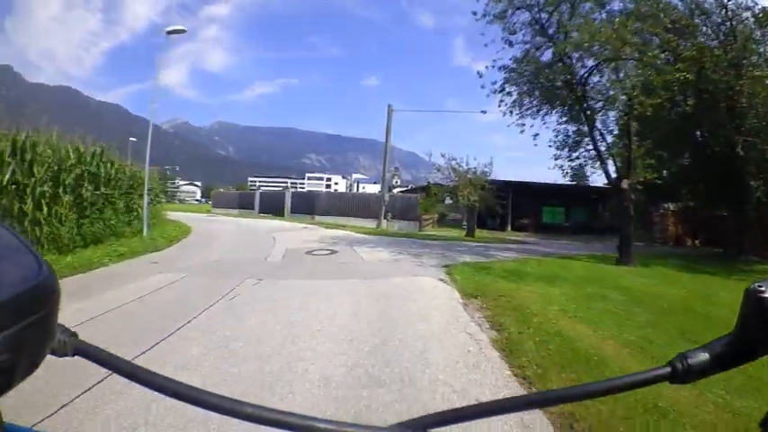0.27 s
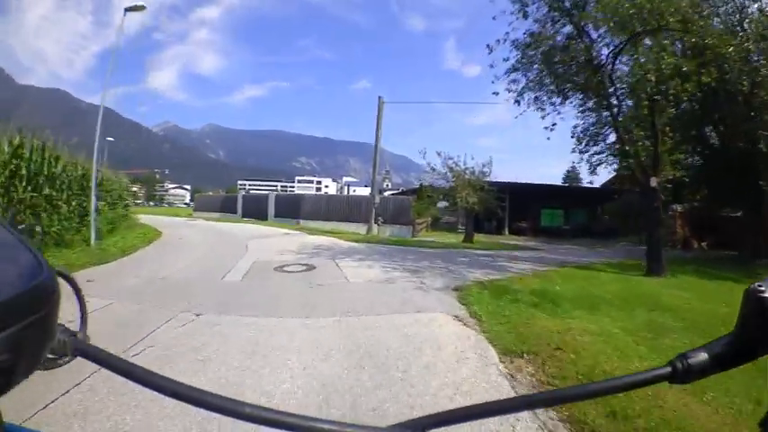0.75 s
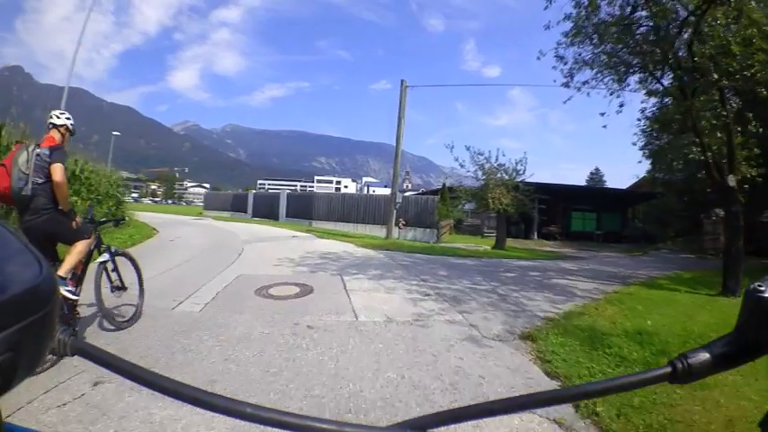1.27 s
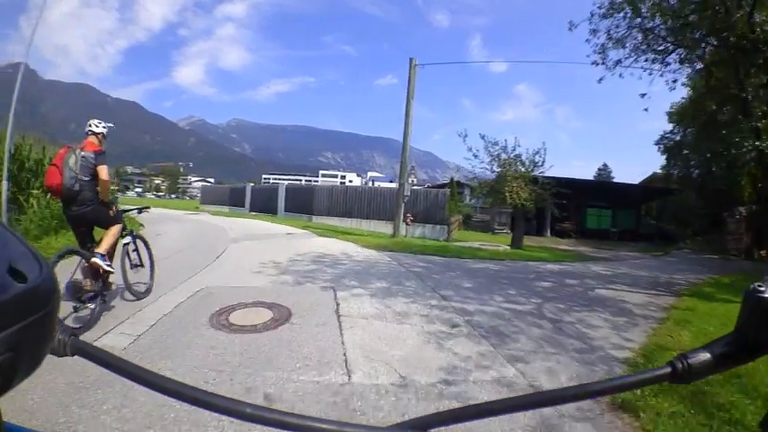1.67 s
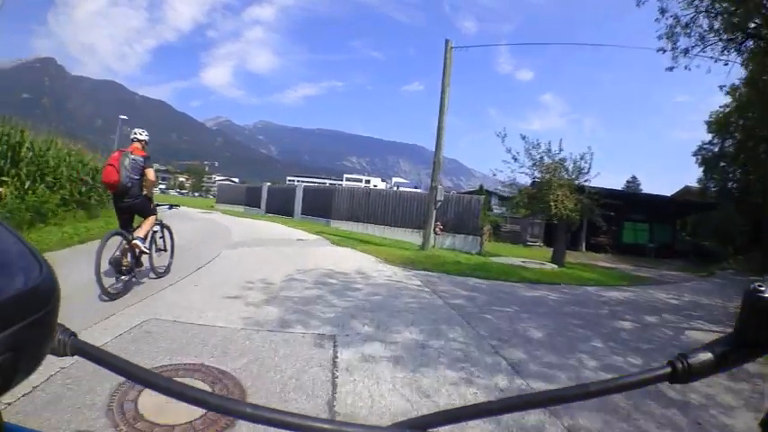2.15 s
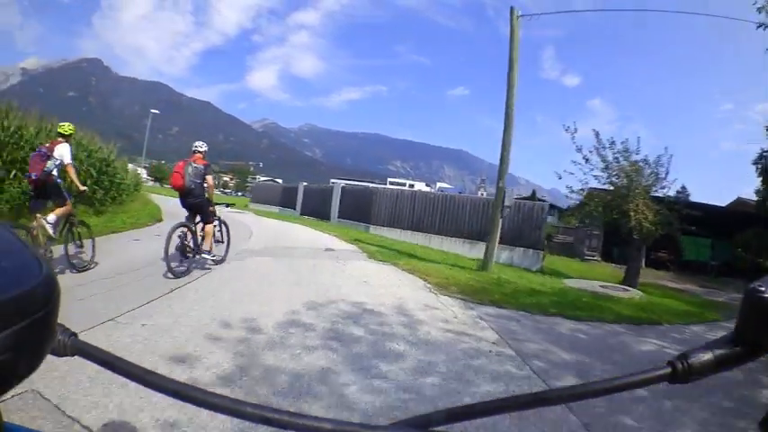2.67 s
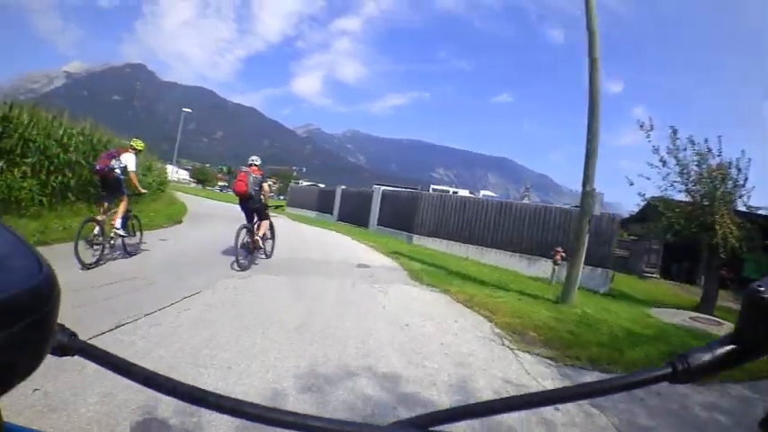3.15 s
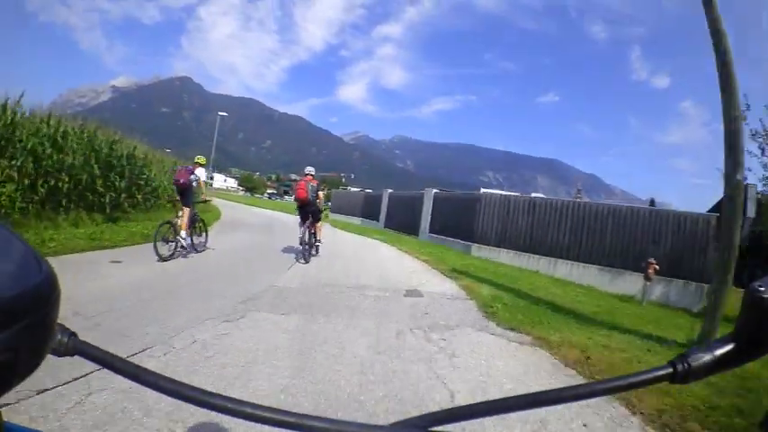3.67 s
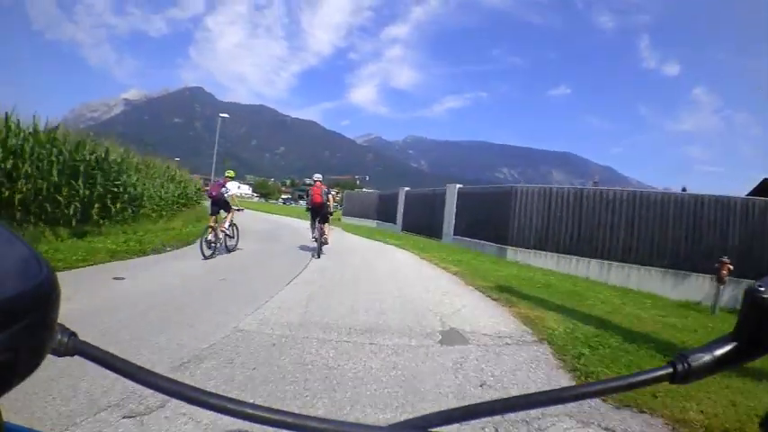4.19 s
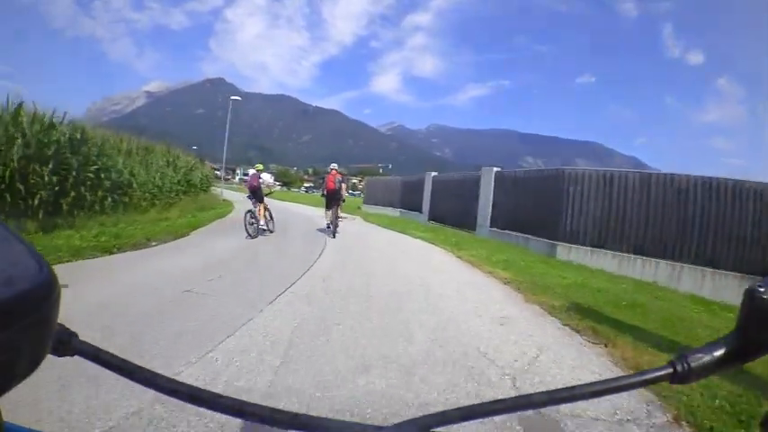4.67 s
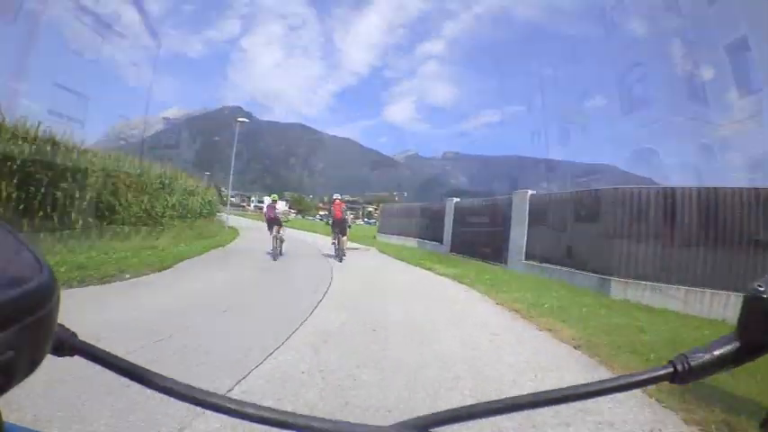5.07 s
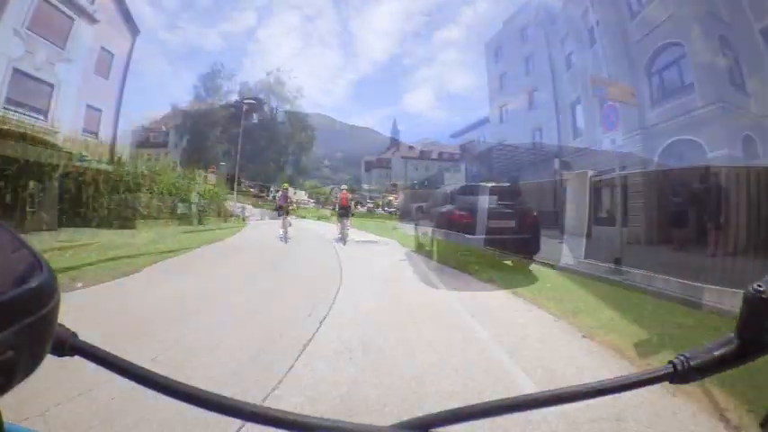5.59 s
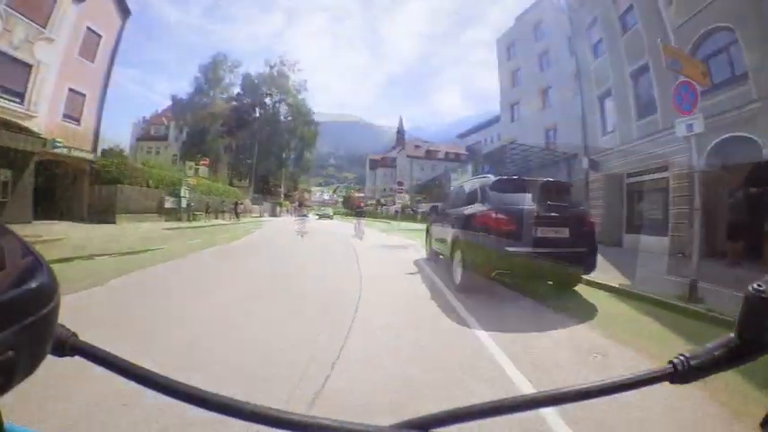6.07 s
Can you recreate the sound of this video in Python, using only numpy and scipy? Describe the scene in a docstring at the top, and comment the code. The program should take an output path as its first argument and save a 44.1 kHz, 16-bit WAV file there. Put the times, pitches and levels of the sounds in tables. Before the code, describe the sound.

Close, structure-borne sound of a bike riding along a paved road. The bar and its small housing hum low and unevenly over road rumble and a thin hiss. Isolated muffled thuds give way to hard double knocks with ringing frame and jingling loose fittings, momentarily ducking the sound. Softer bumps continue, another burst of knocks follows, and the ride settles into a quiet roll with a small, hollow tone passing through.

```python
"""A handlebar and the small housing fixed to it hum as a bicycle rolls over rough asphalt: filtered noise.
A low rumble and tyre hiss are noise too; short booms are swelling sines and freewheel ticks are pulsed noise.
Bumps knock through the frame and loose fittings rattle: decaying sines and noise bursts at listed times.
Hard knocks duck a gain control; towards the end hum and rumble grow quieter and a faint narrow drone swells."""
import sys
import numpy as np
from scipy import signal
from scipy.fft import rfft, irfft, next_fast_len
from scipy.io import wavfile
from scipy.ndimage import uniform_filter1d

SR = 44100
rng = np.random.default_rng(int(sys.argv[2]) if len(sys.argv) > 2 else 0)


def log_audio(samples):
    """Write samples as a 16-bit WAV file to the path given in sys.argv[1]."""
    # one column per channel
    frames = np.atleast_2d(samples).T
    # limit to full scale, then quantise
    limited = np.clip(frames, -1, 1)
    pcm = np.round(limited * 32767).astype(np.int16)
    wavfile.write(sys.argv[1], SR, pcm)


N = 279263
TIME = np.arange(N) / SR   # [s]
SIDES = np.array([[1], [-1]])   # opposite sign on left and right

# Resonances of bar and housing: (frequency [Hz], width [Hz], lift [dB])
HOUSING = [(177.3, 26.8, 8), (203, 14.6, 8.5), (310.4, 7.9, 7), (407, 71, 11.5), (489.7, 63, 7.5),
           (736, 69, 8.5)]


def from_db(db):
    """Amplitude ratio: 20 dB is a factor of ten."""
    return 10 ** (np.asarray(db) / 20)


def rms_one(x):
    """Normalisation: mean power is the mean square, here scaled to one."""
    return x / np.sqrt(np.mean(x ** 2) + 1e-20)


def in_time(rows):
    """Linear interpolation: each column of a curve becomes an envelope with a value at every sample."""
    s, *columns = np.transpose(rows)
    return [np.interp(TIME, s, c) for c in columns]


def drift(rate):
    """Slow random modulation: low-passed noise of rms 1, its amplitude response halved at rate [Hz]."""
    hz = np.arange(N // 2 + 1) * SR / N
    slow = rfft(rng.standard_normal(N)) / (1 + (hz / rate) ** 4)
    return rms_one(irfft(slow, N))


def stereo_noise(side_db):
    """Partial coherence: white noise common to both sides plus a share of opposite sign."""
    mid, side = rng.standard_normal((2, N))
    return mid + from_db(side_db) * side * SIDES


def coloured(x, spectrum):
    """Spectral shaping: noise is multiplied by a magnitude curve over log frequency; rms 1."""
    size = next_fast_len(N)
    hz, db = np.transpose(spectrum)
    bins = np.maximum(np.arange(size // 2 + 1) * SR / size, 1)
    gain = from_db(np.interp(np.log(bins), np.log(hz), db))
    return rms_one(irfft(rfft(x, size) * gain, size)[..., :N])


def resonant(x, resonances):
    """Resonance: each lightly damped mode lifts a narrow band and rings on."""
    for hz, width, lift_db in resonances:
        b, a = signal.iirpeak(hz, hz / width, fs=SR)
        x = x + (from_db(lift_db) - 1) * signal.lfilter(b, a, x)
    return x


def struck(modes, t, spread_db, detune):
    """Modal impulse response: a blow excites decaying sines of varied strength, tuning and side lead; peak 1."""
    hz, db, t60, skew = np.transpose(modes)[:, :, None]
    own, side, off = rng.standard_normal((3, len(modes), 1))
    lead = skew * np.sign(side) * SIDES[:, None]
    phase = 2 * np.pi * hz * (1 + detune * off) * t + lead
    decay = from_db(db + spread_db * own - 60 * t / t60)
    onset = 1 - np.exp(-t * hz.min() * 2 * np.pi)
    out = np.sum(decay * np.sin(phase), axis=1) * onset
    return out / np.abs(out).max()


def crunch(t, low_hz, high_hz, t60):
    """Contact noise: band-limited noise with a brief rise, then an exponential decay."""
    rise_s, side_db = 0.00011, -3.5
    sos = signal.butter(3, [low_hz, min(high_hz, .45 * SR)], "band", fs=SR, output="sos")
    mid, side = signal.sosfilt(sos, rng.standard_normal((2, len(t))))
    noise = rms_one(mid + from_db(side_db) * side * SIDES)
    return noise * from_db(-60 * t / t60) * (1 - np.exp(-t / rise_s))


def add(out, s, sound):
    """Superposition: a short sound is summed in at its time [s]."""
    at = round(s * SR)
    out[:, at:at + sound.shape[-1]] += sound[..., :N - at]


def drone():
    """Narrow-band noise: three bands, each passed twice through a resonator, swell and fade."""
    # Level of the drone: (time [s], level [dB])
    swell = [(5.3, -55), (5.48, -48.5), (5.62, -43), (5.85, -46.5), (6.0, -72)]
    # Its bands: (frequency [Hz], resonator width [Hz], level [dB])
    bands = [(838, 61, 0), (1295, 210, -7.5), (1780, 80, -15.5)]
    level_db, = in_time(swell)
    out = 0
    for hz, width, db in bands:
        b, a = signal.iirpeak(hz, hz / width, fs=SR)
        once = signal.lfilter(b, a, rng.standard_normal(N))
        out = out + from_db(db) * rms_one(signal.lfilter(b, a, once))
    return from_db(level_db) * rms_one(out)


def freewheel(fine_db, sharpness, uneven_db):
    """Periodic excitation: pawls brush over one tooth after another, at a rate set by the wheel, unevenly."""
    # Speed of the freewheel: (time [s], tick rate [1/s])
    tick_rate = [(.5, 35.5), (1.1, 38), (1.5, 37), (1.7, 24.2), (2.3, 24.8), (3.2, 23.5), (4.9, 23),
                 (5.6, 19)]
    # How firmly the pawls brush: (time [s], level over the fine hiss [dB])
    firmness = [(0, -2), (1, -2), (2.6, -4.5), (4.6, -1), (5.6, -5)]
    # Spectrum of the brushing: (frequency [Hz], relative density [dB])
    pawl = [(3000, -8.5), (6000, -7), (7800, -2.5), (10500, 4.5), (12000, -5), (15500, -2.5)]
    tooth_at_s = 4.058   # a moment at which a pawl drops over a tooth
    (per_s,), (level_db,) = in_time(tick_rate), in_time(firmness)
    teeth = np.cumsum(per_s) / SR
    turn = 2 * np.pi * (teeth - np.interp(tooth_at_s, TIME, teeth))
    brush = rms_one(np.exp(sharpness * np.cos(turn)))
    level = from_db(fine_db + level_db + uneven_db * drift(20))
    return level * brush * coloured(stereo_noise(side_db=-7.5), pawl)


def tyres(tyre_db, fine_db, grit_db, fine_drift_db):
    """Random excitation: tread on grit excites metal resonances, under a fine hiss with its own level curve."""
    # Spectra of tread and fine hiss: (frequency [Hz], relative density [dB])
    tread_spectrum = [(30, -18.5), (800, 9), (1100, 3), (1500, 0), (2300, -4), (2800, -5), (3400, -8.5),
                      (3900, -10.5), (4300, -12), (4800, -18), (5400, -21), (6000, -19), (7500, -35.5),
                      (15000, -56)]
    fine_spectrum = [(2000, -24), (5000, 3), (6300, 3), (7800, -1.5), (10000, 4), (15500, 0.5)]
    # Thin rings of the metal parts: (frequency [Hz], width [Hz], lift [dB])
    metal = [(2300, 41, 3), (3110, 22, 2.5), (3787, 43, 6), (4200, 37, 6)]
    left_lean_db = 4   # left over right, in the fine hiss
    grit = from_db(grit_db * drift(96))
    tread = coloured(stereo_noise(side_db=-9.0) * grit, tread_spectrum)
    fine = coloured(stereo_noise(side_db=-5.0), fine_spectrum) * from_db(left_lean_db * SIDES / 2)
    fine_level = from_db(fine_db + fine_drift_db * drift(7))
    return from_db(tyre_db) * resonant(tread, metal) + fine_level * fine


def tap(t, ring_db, bright_db, zing_hz, rasp_db, zing_db, edge_db):
    """Impact of small parts: modes ring, contact rasps, and a brighter touch adds more high overtones and edge."""
    # Modes of the fittings: (frequency [Hz], level [dB], t60 [s], phase lead or lag of each side [rad])
    fittings = [(1396, -3, 0.036, 0.31), (2300, -9.5, 0.037, 0.22), (3150, -11, 0.032, 0.36),
                (3810, -4.5, 0.028, 0.41), (4230, .5, 0.024, 0.25)]
    half_width_hz = 840 / 2   # half the spread of the high overtones
    edge_growth = 1.8   # dB of sharp edge per dB of brightness
    ring = from_db(ring_db) * struck(fittings, t, spread_db=3.5, detune=.02)
    rasp = from_db(rasp_db) * crunch(t, low_hz=1570, high_hz=4460, t60=0.041)
    overtones = crunch(t, low_hz=zing_hz - half_width_hz, high_hz=zing_hz + half_width_hz, t60=0.012)
    zing = from_db(bright_db + zing_db) * overtones
    edge = from_db(edge_db + edge_growth * bright_db) * crunch(t, low_hz=8900, high_hz=13500, t60=0.008)
    return ring + rasp + zing + edge


def rattle():
    """Inelastic rebound: a loose fitting thrown against the bar taps, then bounces once, more softly."""
    # Throws: (time [s], level [dB], ring [dB], brightness [dB], overtone pitch [Hz])
    throws = [(.2544, -38, 3, -17, 6300), (0.615, -38, 10.5, -8, 6300), (.901, -26.5, -3, -16, 6000),
              (2.4985, -34, 9, -5, 6600), (2.5157, -19.5, 0, -5, 6500), (2.5195, -19, 10.5, -2, 6650),
              (2.8433, -38, 10, -17, 5800), (2.848, -32.5, 9, -14, 5800), (2.8675, -31.5, 9, -9, 6400),
              (2.881, -29, 9, -9, 6200), (2.885, -18, -7, -12, 5600), (2.959, -42, 8, -9, 6300),
              (3.112, -42, 11.5, -12, 6300), (3.158, -38.5, 9.5, -14, 6200), (3.187, -38, 7.5, -11, 6400),
              (3.231, -38, 10.5, -7, 6100), (3.441, -39, 9.5, -16, 6300), (3.464, -42, 12, -18, 6300),
              (3.517, -39, 11, -10, 6400), (4.289, -39, 5.5, -11, 6300), (4.792, -39.5, 3, -8.5, 6200),
              (4.908, -38.5, 6, -19, 6200), (4.929, -30, -3, -11, 6300), (4.939, -37.5, 8, 0, 7000),
              (4.956, -41, 5, -10, 5900), (4.981, -39, -3, -9, 6300), (4.997, -38.5, 7, -14, 6300),
              (5.251, -46, -7, -8, 6200), (5.2912, -41, 15.5, 3, 6070), (5.3, -49, 4, 2, 6200),
              (5.316, -45, 10, -14, 6000), (5.3255, -49, 8, 2.5, 6070), (5.3375, -49, 11, 1, 6100),
              (6.031, -43.5, 9, -22, 6000)]
    bounce_s, bounce_loss_db = 0.0077, 19
    out, t = np.zeros((2, N)), TIME[:SR // 10]
    for s, db, ring_db, bright_db, zing_hz in throws:
        for delay_s, loss_db in ((0, 0), (bounce_s, bounce_loss_db)):
            touch = tap(t, ring_db, bright_db, zing_hz, rasp_db=-5.5, zing_db=6.5, edge_db=-1.5)
            add(out, s + delay_s, from_db(db - loss_db) * touch)
    return out


def thud(t, hz, cycles, housing_share):
    """Damped oscillation: a soft push of a cycle or two, partly filtered by housing resonances; peak 1."""
    turns = t * hz
    push = turns ** 2 * np.exp(-2 * turns / cycles) * np.sin(2 * np.pi * turns)
    push = push + housing_share * (resonant(push, HOUSING) - push)
    return push / np.abs(push).max()


def bumps(cycles, shiver_db, crunch_octaves):
    """Impulsive excitation: at a seam or cover tyre thuds and crunches, bar heaves, frame and small parts ring."""
    # Jolts: (time [s], thud [dB], thud pitch [Hz], frame ring [dB], crunch [dB], crunch pitch [Hz])
    jolts = [(0.8962, -12, 450, -19, -26, 1450), (1.289, -32, 850, -19.5, -30, 1600),
             (2.007, -7, 438, -21.5, -38, 900), (2.118, -8, 408, -21, -48, 900),
             (2.443, -5.5, 416, -32, -40, 900), (2.4958, -19, 195, -20.5, -25, 1200),
             (2.508, -3.5, 515, -2.5, -13, 820), (2.510, -4.5, 640, -8.5, -30, 2100),
             (2.516, -3, 330, -11.5, -20, 850), (2.779, -27, 300, -33, -41, 2200),
             (2.8426, -5.5, 200, -25, -20.5, 1450), (2.848, -2.5, 187, -11.5, -24.5, 1450),
             (2.888, -9, 327, -20, -26, 750), (3.388, -24, 455, -22, -35, 1500),
             (3.412, -12, 460, -17.5, -35, 1600), (3.685, -14, 450, -27, -39.5, 900),
             (4.04, -7.5, 428, -26.5, -39.5, 2020), (4.393, -9, 393, -34, -47, 900),
             (4.748, -7.5, 393, -24.5, -44, 900), (4.866, -9, 436, -23.5, -37, 900),
             (4.909, -22, 300, -18, -31, 2070), (4.9294, -26, 840, -5.5, -22, 1100),
             (4.9345, -2.5, 598, -5.5, -28, 2170), (4.94, -7.5, 260, -20, -23, 890),
             (4.959, -17, 198, -17, -30, 1100), (5.107, -13.5, 447, -28, -37, 1420),
             (5.2431, -7.5, 127.3, -35, -43, 800), (5.2498, -4, 297, -16, -26, 1070),
             (5.2855, -10.5, 136, -35, -54, 900), (5.2878, -7.5, 436, -23, -25, 910),
             (5.329, -16.5, 325, -24.5, -35, 700)]
    # Modes of the frame: (frequency [Hz], level [dB], t60 [s], phase lead or lag of each side [rad])
    frame = [(750, 19, 0.038, 0.3), (880, 2, 0.069, 0.35), (1072, -2.5, 0.086, 0.64),
             (1158, -3.5, 0.04, .6), (1974, -16, 0.06, 0.6), (3180, -13.5, 0.059, 0.68)]
    heave_hz, heave_db = 98, 5.5   # the level is over the crunch
    out, t = np.zeros((2, N)), TIME[:SR // 4]
    reach = 2 ** (crunch_octaves / 2)
    for s, thud_db, thud_hz, ring_db, crunch_db, crunch_hz in jolts:
        push = from_db(thud_db) * thud(t, thud_hz, cycles, housing_share=0.94)
        heave = from_db(heave_db) * thud(t, heave_hz, cycles, housing_share=0)
        ring = from_db(ring_db) * struck(frame, t, spread_db=8, detune=0.022)
        contact = crunch(t, low_hz=crunch_hz / reach, high_hz=crunch_hz * reach, t60=0.034)
        shiver = from_db(shiver_db) * crunch(t, low_hz=900, high_hz=4320, t60=0.15)
        add(out, s, push + ring + from_db(crunch_db) * (heave + contact + shiver))
    return out


def booms():
    """Driven resonance: the road works the bar's lowest mode into short swells of wavering pitch."""
    # Swells: (time of the peak [s], level [dB], pitch [Hz])
    swells = [(.97, -9, 198), (2.345, -15.5, 190), (3.135, -18, 197), (3.9, -15, 201), (6.21, -22, 172)]
    half_length_s = 0.042   # from the peak down to 1/e
    waver_hz = 4.94 * drift(17)
    out = 0
    for s, db, hz in swells:
        swell = np.exp(-((TIME - s) / half_length_s) ** 2)
        phase = 2 * np.pi * np.cumsum(hz + waver_hz) / SR
        out = out + from_db(db) * swell * np.sin(phase)
    return out


def road(rumble_db, hum_db, grain_db, lumpy_db, sway_db):
    """Forced vibration: asphalt grains shake and sway the bar in clumps; longer surface waves rumble."""
    # Spectra of shaking, sideways sway and rumble: (frequency [Hz], relative density [dB])
    shake_spectrum = [(25, -49), (100, -16), (145, 2.5), (250, 1), (350, -8), (500, -8), (600, -14),
                      (800, -23), (1100, -29), (2000, -33.5), (5000, -61.5)]
    sway_spectrum = [(60, -15), (140, 8.5), (200, 5), (280, -3), (450, -3.5), (530, -3), (600, 3.5),
                     (690, -7.5), (820, -22.5), (1150, -19.5), (2000, -35), (5000, -45.5)]
    rumble_spectrum = [(15, -38.5), (30, -27), (50, -9), (80, 0.5), (120, 2), (160, -0.5), (260, -20),
                       (600, -69)]
    grains = from_db(grain_db * drift(90))
    shake, sideways = rng.standard_normal((2, N)) * grains
    hum = rms_one(resonant(coloured(shake, shake_spectrum), HOUSING))
    sway = from_db(sway_db) * coloured(sideways, sway_spectrum) * SIDES
    lumps = from_db(lumpy_db * drift(50))
    rumble = coloured(stereo_noise(side_db=-17.0) * lumps, rumble_spectrum)
    return from_db(hum_db) * (hum + sway) + from_db(rumble_db) * rumble


def scene():
    """Linear superposition: rolling noise, knocks and rattle sum as pressures."""
    # How hard the asphalt shakes the handlebar: (time [s], hum [dB])
    roughness = [(0, -19.5), (.25, -18.5), (.44, -19), (.6, -16), (.85, -16.5), (1.06, -18.5), (2.4, -18),
                 (2.64, -22.5), (2.86, -16), (3.04, -20.5), (3.34, -21.5), (3.52, -19), (3.73, -24.5),
                 (3.87, -16.5), (4.15, -20), (4.8, -20), (5.2, -24), (5.39, -31), (5.5, -26.5), (5.64, -32),
                 (5.79, -25), (5.94, -31.5), (6.18, -24), (6.32, -27.5)]
    # Longer waves in the surface: (time [s], rumble [dB])
    unevenness = [(0, -22), (.62, -25), (.85, -37), (1, -26), (1.7, -26.5), (2.35, -29.5), (2.75, -32),
                  (2.88, -20), (3.3, -35.5), (3.7, -35.5), (3.98, -23.5), (4.15, -34.5), (4.4, -27),
                  (4.9, -28), (5.28, -34), (5.42, -40), (5.92, -43), (6.05, -56), (6.13, -39), (6.32, -48)]
    # Rolling: (time [s], tyre hiss ahead of the metal resonances [dB], fine hiss [dB])
    hiss = [(0, -37, -65), (.27, -39.5, -62), (.47, -38.5, -67), (.76, -39.5, -61), (1.1, -39, -65.5),
            (1.75, -40.5, -64.5), (2.4, -41.5, -64), (2.7, -45.5, -67.5), (3.3, -45.5, -68),
            (3.42, -40.5, -67.5), (3.72, -46, -66.5), (4, -45, -68), (4.7, -47, -69.5), (5.15, -46.5, -68),
            (5.55, -47, -74.5), (5.93, -45, -72), (6.1, -39.5, -69), (6.32, -42, -70)]
    (hum_db,), (rumble_db,), (tyre_db, fine_db) = in_time(roughness), in_time(unevenness), in_time(hiss)
    rolling = road(rumble_db, hum_db, grain_db=1.14, lumpy_db=3.0, sway_db=-20.0)
    rolling = rolling + tyres(tyre_db, fine_db, grit_db=2.5, fine_drift_db=-0.1)
    steady = rolling + booms() + freewheel(fine_db, sharpness=4.3, uneven_db=1.5) + drone()
    return steady + bumps(cycles=0.56, shiver_db=-16, crunch_octaves=0.89) + rattle()


def gain_control(x):
    """Dynamic compression: a peak or treble burst over the limit cuts the gain; it recovers at a steady rate."""
    limit_db, recovery_db_per_s, attack_s = -2, 13.5, 0.0015
    sense_hz, sense_db = 7820, 36.5   # treble above this weighs more
    treble = signal.sosfilt(signal.butter(2, sense_hz, "high", fs=SR, output="sos"), x)
    power = uniform_filter1d(np.mean(treble ** 2, axis=0), size=133)   # over 3 ms
    burst = np.sqrt(np.abs(power))
    sensed = np.maximum(np.abs(x).max(axis=0), from_db(sense_db) * burst)
    over_db = np.maximum(20 * np.log10(sensed + 1e-9) - limit_db, 0)
    # a running maximum along a rising ramp lets each cut shrink linearly
    creep_db = recovery_db_per_s * TIME
    cut_db = np.maximum.accumulate(over_db + creep_db) - creep_db
    keep = np.exp(-1 / (attack_s * SR))
    return x * from_db(-signal.lfilter([1 - keep], [1, -keep], cut_db))


def record(dry):
    """Transducer response: the microphone port hollows a band, gain ducks, peaks saturate, the top is cut."""
    dip_hz, dip_width_hz, dip_db = 4856, 1030, -11.5
    ceiling, cutoff_hz = .84, 15750
    heard = resonant(dry, [(dip_hz, dip_width_hz, dip_db)])   # a negative lift is a dip
    ducked = gain_control(heard)
    rounded = ducked / (1 + (ducked / ceiling) ** 10) ** .1
    return signal.sosfilt(signal.ellip(10, .1, 90, cutoff_hz, fs=SR, output="sos"), rounded)


dry = scene()
out = record(dry)
log_audio(out)
```